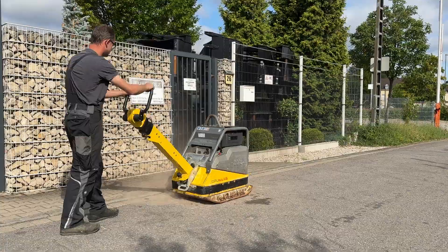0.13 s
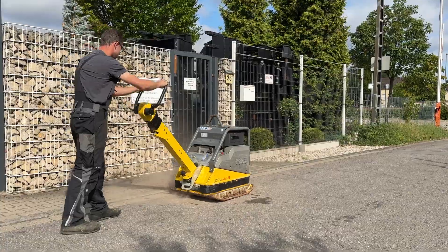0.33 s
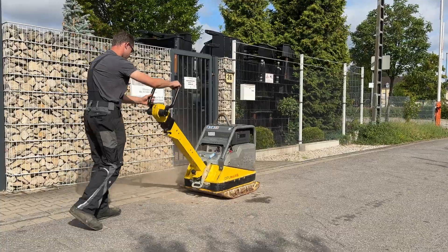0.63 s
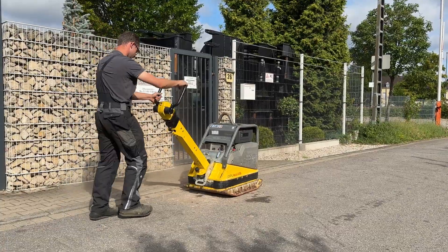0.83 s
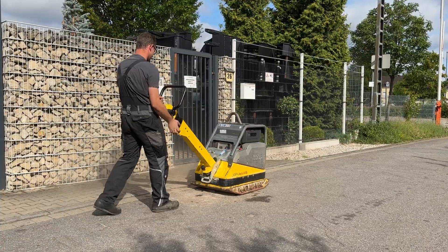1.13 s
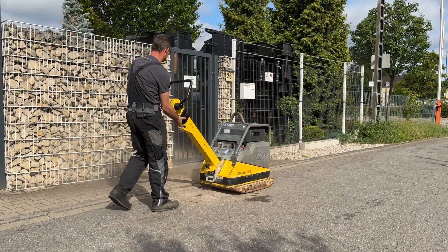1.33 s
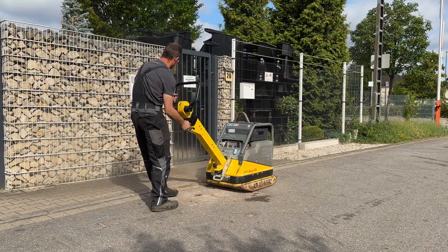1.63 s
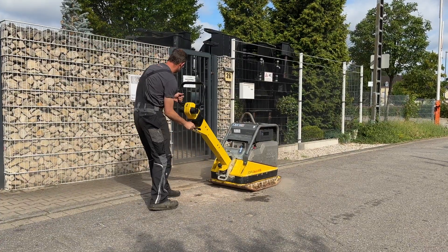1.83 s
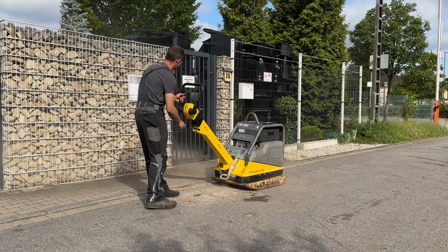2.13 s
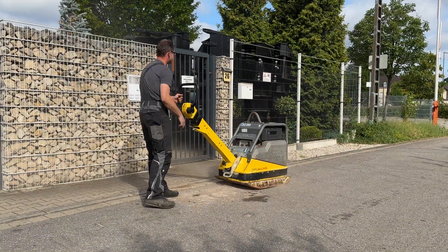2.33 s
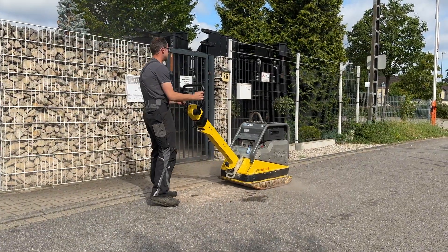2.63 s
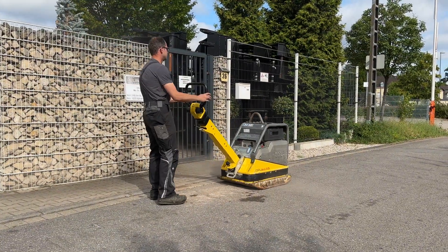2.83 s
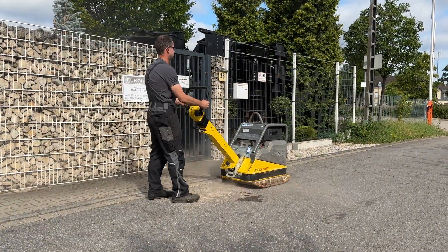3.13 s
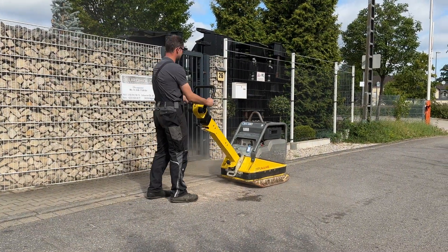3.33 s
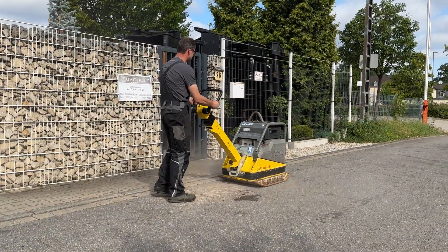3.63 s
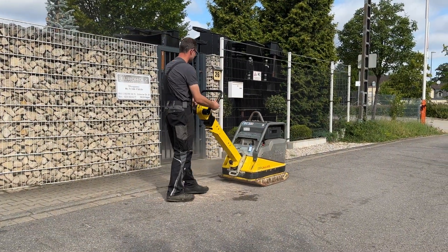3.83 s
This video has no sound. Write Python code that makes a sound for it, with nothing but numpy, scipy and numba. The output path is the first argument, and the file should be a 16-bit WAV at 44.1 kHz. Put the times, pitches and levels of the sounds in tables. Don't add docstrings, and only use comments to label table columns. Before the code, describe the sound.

Close outdoor stereo phone recording of a plate compactor: rapid uneven steel slaps, hollow metallic ringing and loose rattles, then throttle closing, slower pounding and a brief fading idle over faint street murmur.

```python
import sys
import numpy as np
from scipy import signal
from scipy.fft import rfft, irfft
from scipy.io import wavfile
from scipy.ndimage import uniform_filter1d
from numba import njit

SR = 44100
rng = np.random.default_rng(int(sys.argv[2]) if len(sys.argv) > 2 else 0)


def ratio(d):
    e = np.asarray(d, float) / 20
    return 10 ** e


def file_out(sig):
    cols = np.atleast_2d(sig).T
    lim = np.clip(cols, -1, 1)
    pcm = np.round(lim * 32767).astype(np.int16)
    wavfile.write(sys.argv[1], SR, pcm)


N = 176400
T = np.arange(N) / SR
PAD = N + 8820

# frequency in Hz, level in dB.
STREET_COLOUR = [(18, -43), (30, -17), (138, 6.5), (280, -14), (1040, -9.5), (1460, -19), (2610, -23.5),
                 (16000, -63.5)]
# time in seconds, turns in Hz.
SHAFT_SPEED = [(0, 59), (1, 58.8), (1.5, 59.8), (2.03, 58.6), (2.3, 53.5), (2.8, 47), (3.3, 42), (4, 36)]
# time in seconds, level in dB.
SHAFT_HUM = [(0, -30), (1, -29.5), (1.95, -30.5), (2.3, -38), (2.7, -37), (3.2, -50), (4, -67)]
# time in seconds, firings in Hz, level in dB.
ENGINE_RUN = [
    (0, 23.4, -27.5),
    (2, 23.4, -29.5),
    (2.8, 18, -30.5),
    (3.5, 14.2, -27),
    (3.7, 14.1, -37.5),
    (4, 14.1, -49.5),
]
# frequency in Hz, level in dB.
EXHAUST_COLOUR = [(40, -18), (100, 2.5), (220, 1.5), (400, -20), (1000, -20.5), (1700, -25), (4000, -42),
                  (16000, -82)]
# frequency in Hz, level in dB.
KNOCK_COLOUR = [(300, -38), (900, 11.5), (1400, -5), (3000, -18.5), (16000, -46.5)]
HISS_COLOUR = [(1000, -29.0), (4000, -4.0), (9000, 1), (16000, -3)]
# time in seconds, level in dB, rattle share in dB.
BOUNCE_FORCE = [(0, -8.5, -13), (.03, -41.5, -31.5), (.085, -20.5, -28.5), (.11, -12, -26),
                (.3, -20.5, -22), (.9, -23, -23.5), (1.02, -23.5, -18), (1.12, -19, -22.5),
                (1.7, -23.5, -25), (2.09, -25.5, -24.5), (2.15, -49.5, -5), (2.2, -15.5, -22.5),
                (2.45, -22.5, -27), (3.02, -27.5, -32), (3.08, -18.5, -25.5), (3.58, -30.5, -27),
                (3.7, -49, -36), (3.8, -73.5, -14)]
# start in seconds, peak in dB, then thud, ring near 380 Hz and ring near 460
# Hz in dB.
HARD_SLAMS = [(0.085, -22, -2, -6, -4), (0.101, -3.5, -19, -30, -15), (0.117, -1.5, -12.5, -25, -13),
              (0.134, -3.5, -15, -20, -9.5), (0.156, -5, -14.5, -18, -13.5), (0.223, -2.5, -15, -13, -18),
              (0.244, -5.5, -5.5, -13.5, -22), (0.348, -3, -15.5, -11.5, -16), (0.413, -4, -7, -12, -12.5),
              (0.469, -16, -17, -10, -11), (0.522, -11, -26, -8, -5), (0.574, -9.5, -18.5, -14, -4),
              (0.641, -8, -22, -11.5, -11), (0.685, -7, -10, -22, -10.5), (0.699, -8, -10.5, -14, -14),
              (0.734, -10, -20.5, -7.5, -13), (0.825, -11.5, -14, -2.5, -14), (0.856, -12, -3, -17, -5),
              (0.904, -2.5, -27, -18, -15), (0.984, -15, -8, -12, -16), (1.039, -17.5, -7.5, -10, -9.5),
              (1.075, -9.5, -5.5, -26, -16), (1.106, -8, -4.5, -26, -8), (1.143, -11.5, -9, -15, -14),
              (1.226, -9, -12.5, -12.5, -20), (1.319, -12.5, -13.5, -7, -7.5),
              (1.344, -8.5, -19, -11.5, -10), (1.409, -14.5, -16, -20, -8), (1.442, -8.5, -12, -10.5, -20),
              (1.494, -6, -25, -10, -19), (1.546, -9, -13, -10.5, -16), (1.642, -9, -20, -20, -8),
              (1.71, -7.5, -9, -10.5, -7.5),
              (1.777, -16, -3, -16, -17), (1.832, -17, -13.5, -1, -4), (1.895, -10, -12, -23, -15),
                 (1.928, -8.5, -14.5, -13.5, -10), (1.948, -4.5, -14, -19.5, -10),
                 (1.969, -10.5, -12.5, -14, -27), (2.046, -15.5, -2, -4, -12), (2.065, -12, -14, -11, -18),
                 (2.16, -14.5, -9, -12, -10), (2.176, -9.5, -11, -10, -6.5), (2.211, -3, -20, -18, -13.5),
                 (2.285, -13.5, -24, -14, -13), (2.305, -8, -17, -11, -10.5),
                 (2.327, -5.5, -21, -17.5, -27), (2.42, -12.5, -12, -8, -13), (2.501, -15, -8, -10, -12.5),
                 (2.558, -7.5, -12.5, -9.5, -17), (2.589, -12, -6, -16.5, -16),
                 (2.629, -7, -17.5, -19, -14.5), (2.695, -12.5, -14, -16, -14.5),
                 (2.752, -9.5, -9, -8, -13), (2.819, -17, -9.5, -10, -8.5), (2.863, -19, -9.5, -13.5, -7.5),
                 (2.903, -11, -15, -32, -7.5), (3.048, -6, -12.5, -10, -13.5),
                 (3.097, -12.5, -15, -11, -11), (3.124, -12, -13, -25, -13.5),
                 (3.171, -14.5, -9.5, -21, -13.5), (3.222, -18, -16.5, -23, -7),
                 (3.277, -13, -6.5, -19, -13), (3.303, -11, -11.5, -10.5, -13.5),
                 (3.336, -13.5, -6, -17.5, -25), (3.407, -5.5, -19, -16.5, -19),
                 (3.536, -16.5, -9, -10, -10), (3.564, -18.5, 0.5, -20, -9.5),
                 (3.599, -23.5, -14, -20, -11), (3.649, -35, 0, -21, -10)]
# start in seconds, peak in dB.
LOOSE_CLASHES = [(0.0883, -39), (0.1188, -34), (0.1563, -35), (0.416, -33.5), (0.5199, -41), (0.5872, -36),
                 (0.633, -35), (0.7385, -31.5), (0.827, -37), (0.8571, -37), (1.0501, -34), (1.2287, -33.5),
                 (1.4883, -40.5), (1.5317, -37), (1.566, -40.5), (1.7125, -30.5), (2.0469, -46),
                 (2.1706, -34.5), (2.2073, -36), (2.4315, -41.5), (2.463, -35.5), (2.55, -35.5),
                 (2.5941, -40.5), (2.6311, -34), (2.6834, -43), (2.7546, -34), (2.867, -35),
                 (3.0247, -39.5), (3.0454, -27.5), (3.1257, -35.5), (3.185, -38.5), (3.2806, -43),
                 (3.4026, -37.5), (3.539, -32.5)]
# frequency in Hz, level in dB, 60 dB decay in seconds.
PLATE_MODES = [(178, -12, 0.077), (259, -9, 0.073), (350, -18.5, 0.06), (380.5, -0.5, 0.28),
               (461.3, -1, 0.35), (506.7, -2, 0.12), (603.4, 0, 0.1), (672.6, 2, 0.18), (905, -5, 0.096),
               (980.5, -11, 0.098), (1205, -7.5, 0.058), (1431, -21, 0.18), (1882, -21.5, 0.11),
               (6240, -34, 0.055)]
# frequency in Hz, gain in dB.
SLAP_COLOUR = [(40, -11.5), (100, -2.5), (250, 10), (700, -1), (1300, -9), (1700, -37.5), (3000, -54.5),
               (8000, -81.5)]
# frequency in Hz, gain in dB.
RATTLE_COLOUR = [(600, -20.5), (1500, 1.5), (2500, 3), (3800, -8.5), (5500, -7.5), (8000, -14),
                 (11000, -14.5), (16000, -23.5)]
# frequency in Hz, level in dB.
SCATTER_COLOUR = [(40, -46), (150, -18), (600, -15), (1300, -7), (3000, -9), (9000, -6), (11300, -32),
                  (12800, -8)]
# frequency in Hz, phase in radians by which the left leads.
PORT_LEAD = [(2240, .05), (2930, 1.1), (4310, .2), (6800, .4), (8400, 6.1), (10750, 3.25), (11900, 3.05),
             (13700, 0)]


def level(x, db):
    return x * ratio(db) / np.sqrt(np.mean(x ** 2))


def curve(table, column):
    rows = np.array(table, float)
    return np.interp(T, rows[:, 0], rows[:, column])


def over_hz(table):
    rows = np.array(table, float)
    return np.interp(np.log(np.fft.rfftfreq(PAD, 1 / SR) + 1), np.log(rows[:, 0]), rows[:, 1])


def colour(x, table):
    return irfft(rfft(x, PAD) * ratio(over_hz(table)), PAD)[:N]


def spikes(times, sizes):
    return np.bincount(np.clip(np.asarray(times) * SR, 0, N - 1).astype(int), sizes, N)


def fade(x, t60):
    return signal.lfilter([1], [1, -np.exp(-np.log(1000) / (t60 * SR))], x)


def chance(*shape):
    return rng.standard_normal(shape).clip(-1.7, 1.7)


def street():
    return level(colour(rng.standard_normal(N), STREET_COLOUR), -47)


def hum():
    turns = np.cumsum(curve(SHAFT_SPEED, 1)) / SR
    return np.sqrt(2) * ratio(curve(SHAFT_HUM, 1)) * np.sin(2 * np.pi * turns)


def engine():
    cycles = np.cumsum(curve(ENGINE_RUN, 1)) / SR
    cycles = cycles - np.interp(3.946, T, cycles)
    beats = np.arange(np.ceil(cycles[0]), cycles[-1] - .5)
    size = ratio(2.5 * rng.standard_normal((2, len(beats))))
    fire = spikes(np.interp(beats, cycles, T), size[0])
    valve = spikes(np.interp(beats + 0.51, cycles, T), size[1])
    air = rng.standard_normal((3, N))
    pressure = fade(0.35 * fire + 0.77 * valve, 0.072) + 0.31
    puff = colour(pressure * air[0], EXHAUST_COLOUR)
    knock = colour(fade(fade(fire, .012), .07) * air[1], KNOCK_COLOUR)
    hiss = colour(fade(fade(valve, 0.051), 0.11) * air[2], HISS_COLOUR)
    return ratio(curve(ENGINE_RUN, 2)) * (level(puff, 0) + level(knock, -11) + level(hiss, -30.5))


def slams():
    rows = np.array(HARD_SLAMS, float)
    first = rows[:, 0] + 0.00098
    gaps = .017 * np.exp(.3 * chance(2, len(rows)))
    times = np.r_[first, first + gaps[0], first + gaps[0] + gaps[1]]
    rebound_db = -9.5 * np.repeat([0, 1, 2], len(rows))
    force = ratio(np.tile(rows[:, 1], 3) - 6.5 + rebound_db)
    lean_db = rows[:, 2:] - np.median(rows[:, 2:], axis=0)
    return first, times, force, np.tile(lean_db, (3, 1))


def bounces(first):
    turns = np.cumsum(curve(SHAFT_SPEED, 1)) / SR
    count = int(turns[-1])
    beats = np.interp(np.arange(count) + 0.2503 * chance(count), turns, T)
    stray = np.cumsum(-np.log(1 - rng.random(600))) / 110
    times = np.r_[beats, stray[stray < T[-1]]]
    at = (np.clip(times, 0, T[-1]) * SR).astype(int)
    is_stray = np.arange(len(times)) >= count
    until_slam = first[None] - times[:, None]
    airborne = ((until_slam > 0) & (until_slam < .03)).any(axis=1)
    force_db = curve(BOUNCE_FORCE, 1)[at] + 4 * chance(len(times)) - 3.4 * is_stray - 5 * airborne
    return times, ratio(force_db), curve(BOUNCE_FORCE, 2)[at]


@njit
def ring(x, turn, keep):
    y, z = np.empty(len(x)), 0j
    for i in range(len(x)):
        z = z * turn * keep[i] + x[i]
        y[i] = z.imag
    return y


def plate_ring(times, force, lean_db, first, hard_count):
    small_count = len(times) - hard_count
    aim = np.r_[np.full(hard_count, .9), np.full(small_count, .3)]
    spread = np.r_[np.full(len(first), .2), np.full(len(times) - len(first), .6)]
    settle_s = 0.0078
    damping = uniform_filter1d(spikes(first - settle_s / 2, np.ones(len(first))), int(settle_s * SR))
    keep = ratio(-5 * damping) * ratio(-300 / SR * (T > 3.7))
    rings = 0
    for hz, db, t60 in PLATE_MODES:
        lean = ratio(lean_db[:, 1] * (300 < hz < 420) + lean_db[:, 2] * (420 < hz < 550))
        hits = force * lean * (aim + spread * chance(len(times)))
        contact = times + .0015 * rng.random(len(times))
        turn = np.exp((2j * np.pi * hz - np.log(1000) / t60) / SR)
        rings = rings + ratio(db) * ring(spikes(contact, hits), turn, keep)
    return ratio(-5) * rings


def slap(times, thud):
    return ratio(7) * colour(fade(spikes(times, thud), 0.023) * rng.standard_normal(N), SLAP_COLOUR)


def loose_parts(times, kicks):
    clashes = np.array(LOOSE_CLASHES, float)
    clash = spikes(clashes[:, 0], ratio(clashes[:, 1] + 0.5))
    hz, shake = np.fft.rfftfreq(PAD, 1 / SR), 0
    for part_hz in [1800, 4500, 10000]:
        kick = fade(clash + spikes(times, kicks * ratio(6.7 * chance(len(times)))), 0.017)
        swell = fade(kick, 0.022) + 0.49 * fade(kick, 0.19)
        burst = level(swell, 0) * rng.standard_normal(N)
        shake = shake + rfft(burst, PAD) * np.exp(-np.log((hz + 1) / part_hz) ** 2 / .5)
    return level(colour(irfft(shake, PAD)[:N], RATTLE_COLOUR), -41.5)


def plate():
    first, hard, hard_force, hard_lean = slams()
    small, small_force, small_rattle_db = bounces(first)
    times, force = np.r_[hard, small], np.r_[hard_force, small_force]
    lean_db = np.r_[hard_lean, np.zeros((len(small), 3))]
    kicks = force * ratio(np.r_[np.full(len(hard), -26.5), small_rattle_db])
    is_hard = np.arange(len(times)) < len(hard)
    thud = force * ratio(lean_db[:, 0] - 5.8 * is_hard)
    rings = plate_ring(times, force, lean_db, first, len(hard))
    return rings + slap(times, thud) + loose_parts(times, kicks)


def scatter(dry):
    step, wet = int(0.034 * SR), 0
    for share in rng.standard_normal((4, 400)):
        tail = np.exp(-np.log(1000) * T / 0.095) * rng.standard_normal(N)
        weight = np.interp(np.arange(N) / step, np.arange(len(share)), share)
        wet = wet + rfft(dry * weight, PAD) * rfft(tail / np.sqrt(np.sum(tail ** 2)), PAD)
    return wet * ratio(over_hz(SCATTER_COLOUR) - 5)


def scene():
    dry = street() + engine() + plate()
    wet = scatter(dry)
    direct = rfft(dry + hum(), PAD)
    turn = np.exp(.5j * over_hz(PORT_LEAD))
    left = irfft((direct + wet) * turn, PAD)
    right = irfft((direct - wet) / turn, PAD)
    return np.array([left, right])[:, :N]


def band_limit(x):
    return signal.sosfilt(signal.butter(12, 16190, fs=SR, output="sos"), x)


def record(dry):
    x = signal.sosfilt(signal.butter(3, 45, "high", fs=SR, output="sos"), dry)
    x = x / (1 + np.abs(x / .85) ** 4) ** .25
    x = signal.sosfilt(signal.ellip(10, .2, 60, 15700, fs=SR, output="sos"), x)
    return band_limit(x)


dry = scene()
out = record(dry)
file_out(out)
```